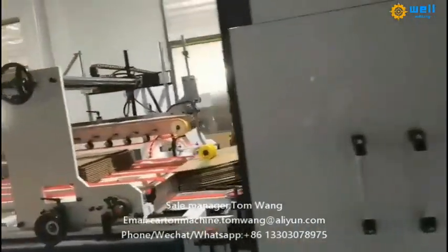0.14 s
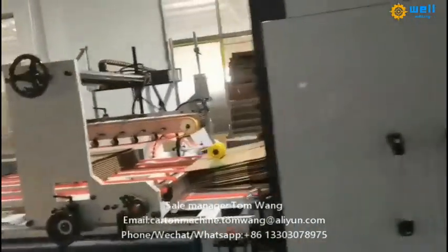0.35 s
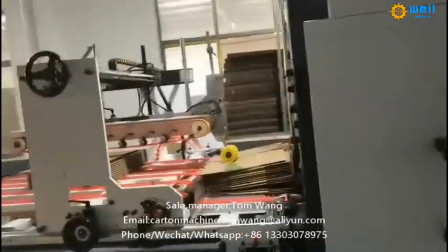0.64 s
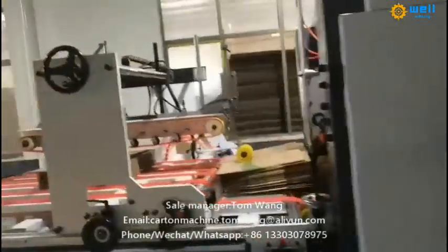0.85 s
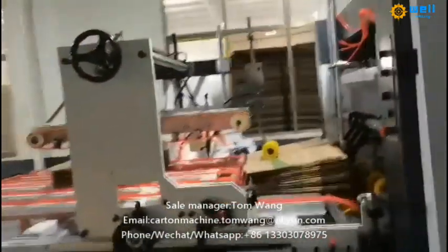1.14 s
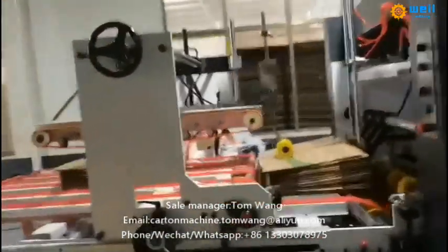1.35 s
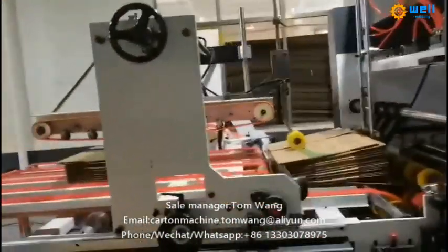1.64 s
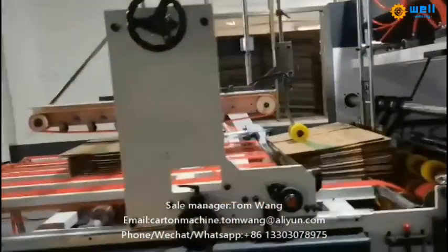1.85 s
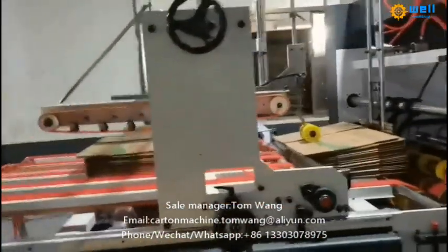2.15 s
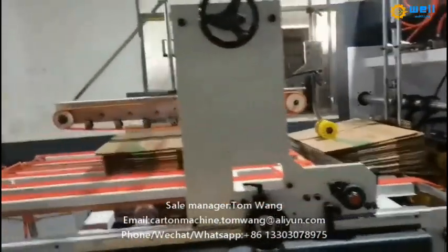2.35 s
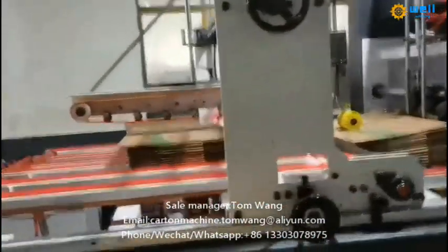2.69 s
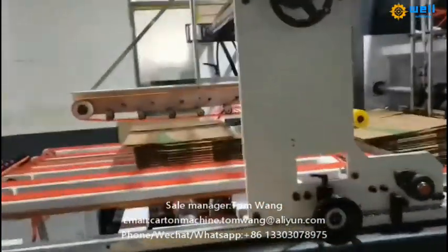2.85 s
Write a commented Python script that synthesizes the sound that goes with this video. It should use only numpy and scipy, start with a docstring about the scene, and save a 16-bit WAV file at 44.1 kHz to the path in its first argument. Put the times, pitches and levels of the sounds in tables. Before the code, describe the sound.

A cardboard folding machine pulls in sheet after sheet, each with a scraping hiss, sharp slaps, dull knocks and a roller rasp. Belts and motors hum underneath while a whine swells and fades in a reverberant factory hall.

```python
"""A carton folder-gluer draws in one cardboard blank about every 0.73 s in a hard-walled factory. Each snatch
brings a scrape and a held, airy hiss; then the blank rasps by friction as the rollers rumble and the frame
booms. Impacts add the rest of the stroke: the board slaps the resonant steel guides, bumps over the rollers and
flexes with a boxy note, and the hall reverberates. Underneath, belts and bearings run on, the motors hum and a
drive whine swells and fades."""
import sys
import numpy as np
from scipy import signal
from scipy.fft import rfft, irfft, next_fast_len
from scipy.io import wavfile
from scipy.ndimage import map_coordinates

SR = 44100
rng = np.random.default_rng(int(sys.argv[2]) if len(sys.argv) > 2 else 0)


def wav_out(sig):
    """Save sig, one row per channel (or a flat mono array), as 16-bit PCM at SR to the path in sys.argv[1]."""
    wavfile.write(sys.argv[1], SR, np.round(np.clip(np.atleast_2d(sig).T, -1, 1) * 32767).astype(np.int16))


N = 133182

# One row per blank. Snatch: t/s, level/dB, attack/s; rollers: t/s, rasp level/dB, hold/s, rumble level/dB
BLANKS = [(-.015, -27.5, 0.027, .2, -21.5, 0.19, -25.5), (.698, -28.5, 0.0029, .94, -22.5, .18, -27.5),
          (1.436, -26, 0.023, 1.66, -23, 0.2, -25), (2.148, -25, 0.02, 2.395, -23.5, 0.18, -25),
          (2.879, -27.5, 0.011, 2.96, -30.5, .18, -29)]
# Spectrum of the rollers: f/Hz, relative level/dB
ROLLER_SPECTRUM = [(20, -33), (55, -12), (95, -7.5), (130, -4), (180, -11.5), (240, 0), (330, -2),
                   (410, -3.5), (490, -6), (580, -13.5), (715, -6.5), (810, -21), (1050, -10), (1300, -70),
                   (2000, -69)]


def amp(db):
    """Amplitude ratio of a level in dB."""
    return 10 ** (np.asarray(db) / 20)


def unit(x):
    """Normalisation to rms 1."""
    return x / np.sqrt(np.mean(x ** 2) + 1e-20)


def clock():
    """Time of each sample, t/s."""
    return np.arange(N) / SR


def along(points, hz):
    """Interpolation of (f/Hz, value) points on a logarithmic frequency axis."""
    f, value = np.transpose(points)
    return np.interp(np.log(hz + 1), np.log(f + 1), value)


def wobble(rate):
    """Random modulation: a spline through rate Gaussian values a second."""
    return map_coordinates(rng.standard_normal(int(N * rate / SR) + 4), [clock() * rate])


def swell(peak_s, rise, fall, hold_s=0, sag=0):
    """Exponential envelope, slopes in dB/s: rises to peak_s, then sags; fall adds in after hold_s."""
    t = clock() - peak_s
    return amp(rise * np.minimum(t, 0) - sag * np.maximum(t, 0) - fall * np.maximum(t - hold_s, 0))


def filtered(x, response):
    """Linear filtering: the spectrum of x times a complex frequency response."""
    size = next_fast_len(N + SR // 2)
    return irfft(rfft(x, size) * response(np.fft.rfftfreq(size, 1 / SR)), size)[:N]


def coloured(x, spectrum):
    """Spectral shaping to rms 1; the colour flickers at random, most in the treble."""
    patch_hz, patch_s = 673, .03
    shaped = filtered(x, lambda f: amp(along(spectrum, f)))
    hz, t, frames = signal.stft(shaped, SR, nperseg=512)
    grid = np.meshgrid(hz / patch_hz, t / patch_s, indexing="ij")
    patches = map_coordinates(rng.standard_normal((128, 512)), grid, mode="wrap")
    flicker_db = 3 * patches * np.sqrt(hz / 5000)[:, None]
    return unit(signal.istft(frames * amp(flicker_db), SR, nperseg=512)[1][:N])


def friction(rate, scatter_db, smooth_db):
    """Friction noise: a Poisson train of tiny uneven impacts, rate a second, over smooth rubbing."""
    hits = (rng.random(N) < rate / SR) * np.sign(rng.standard_normal(N))
    hits *= amp(scatter_db * np.clip(rng.standard_normal(N), -2, 2))
    return unit(unit(hits) + amp(smooth_db) * rng.standard_normal(N))


def guides(x, ring_db):
    """Resonance: x plus the damped modes that it excites in the steel guides."""
    # Modes: f/Hz, bandwidth/Hz, relative level/dB
    modes = [(2073, 72, -5), (2890, 93, -10.5), (3620, 65, -5), (4010, 230, -8), (5270, 85, -5.5),
             (5600, 64, -5), (6160, 58, 0), (6890, 81, -5), (7330, 73, 1.5)]

    def resonance(f):
        return sum(amp(db) * 1j * f * width / (f0 * f0 - f * f + 1j * f * width)
                   for f0, width, db in modes)
    return filtered(x, lambda f: 1 + amp(ring_db) * resonance(f))


def snatches():
    """Sliding friction: a snatched blank scrapes while an airy hiss holds on, then the blank thuds into the
    first rollers."""
    # Spectra of the scrape and the thin hiss: f/Hz, relative level/dB
    scrape_spectrum = [(150, -44), (700, -17), (1400, -2), (2200, -4.5), (3000, -7), (4100, -0.5),
                       (4900, -9.5), (6100, -9.5), (7300, -16.5), (8100, -20), (9300, -14.5), (13500, -24)]
    hiss_spectrum = [(2500, -30), (4200, 0), (5500, 7), (6500, -8), (8000, -3), (9300, 2.5), (11000, -1),
                     (13500, -3)]
    scrape_fall_db_per_s = 63
    scrape, hiss, thud = np.zeros((3, N))
    for start, db, attack_s, *_ in BLANKS:
        t = np.maximum(clock() - start, 0)
        scrape += amp(db - scrape_fall_db_per_s * t) * np.minimum(t / attack_s, 1)
        hiss += amp(-40) * swell(start + .012, rise=1500, fall=110, hold_s=.5, sag=21)
        thud += amp(-28) * swell(start + .069, rise=169, fall=114)
    scrape *= coloured(guides(friction(4000, scatter_db=4, smooth_db=0), ring_db=6.5), scrape_spectrum)
    hiss *= coloured(friction(600, scatter_db=7.5, smooth_db=-3), hiss_spectrum) * amp(.96 * wobble(40))
    thud *= coloured(rng.standard_normal(N), ROLLER_SPECTRUM)
    return scrape + hiss + thud


def motor_hum():
    """Periodic vibration: the motors radiate tones that waver slightly in level and phase."""
    # Tones: f/Hz, rms level/dB
    tones = [(119, -41.5), (227, -45), (703, -47.5), (2030, -55.5)]
    phase = 2 * np.pi * clock()
    return np.sqrt(2) * sum(amp(db + .85 * wobble(6.1)) * np.sin(hz * phase + .59 * wobble(13))
                            for hz, db in tones)


def drive_whine():
    """Amplitude modulation: the drive's single tone swells and fades, with a slight phase jitter."""
    # Envelope: t/s, rms level/dB
    levels = [(0, -29), (.1, -27.5), (.2, -26), (.31, -29), (.355, -44), (.43, -32), (.52, -53), (.64, -65),
              (.76, -30), (.81, -37.5), (.88, -22.5), (.95, -45), (1.19, -34), (1.4, -47), (1.54, -35),
              (1.6, -55), (1.74, -50), (1.82, -26), (1.89, -47), (2.0, -35), (2.09, -49), (2.2, -37),
              (2.42, -41), (2.54, -27.5), (2.59, -37), (2.71, -26.5), (2.79, -33), (2.9, -30.5), (3.0, -27)]
    whine_hz, t = 499.8, clock()
    envelope = amp(np.interp(t, *np.transpose(levels)) + 1.6 * wobble(22.24))
    return np.sqrt(2) * envelope * np.sin(2 * np.pi * whine_hz * t + .45 * wobble(24.02))


def belts():
    """Rolling friction: belts and bearings give a continuous low noise whose level dips now and then."""
    # Running noise: f/Hz, relative level/dB
    spectrum = [(20, -30), (35, -24), (55, -2.5), (98, -5.5), (129, 2.5), (190, -5), (235, 0.5),
                (310, -2.5), (382, -6.5), (440, -8), (498, -3), (584, -13.5), (715, -8), (800, -12),
                (1050, -16), (1500, -22), (2000, -17), (2400, -27.5), (4000, -18.5), (5000, -33),
                (7000, -42), (14000, -45.5)]
    # Envelope: t/s, level/dB
    levels = [(0, -28), (.45, -28.5), (.55, -28), (.61, -35), (.69, -29.5), (.8, -28), (1.1, -26.5),
              (1.29, -26.5), (1.39, -32.5), (1.47, -28.5), (1.8, -27.5), (2.05, -29.5), (2.13, -30.5),
              (2.35, -25.5), (2.7, -28), (3.0, -32)]
    envelope = amp(np.interp(clock(), *np.transpose(levels)) + 1.84 * wobble(18))
    return envelope * coloured(friction(900, scatter_db=4, smooth_db=9.5), spectrum)


def slaps():
    """Impact excitation: board clacks on the steel guides; sharper blows carry more treble."""
    # Blows: t/s, level/dB, treble level re body/dB
    blows = [(.032, -18, -10), (0.132, -21.5, -24), (0.202, -17, -6.5), (.213, -23.5, -10),
             (0.219, -17, -12), (.293, -25, -22), (0.315, -21.5, -24), (.702, -20, -7.5), (.729, -23, -25),
             (.766, -29, -22), (.937, -21, -6), (.962, -21.5, -6), (1.052, -22, -20), (1.456, -27, -9),
             (1.492, -24, -16), (1.618, -30, -24), (1.66, -24, -3), (1.686, -24, -9), (1.738, -24, -22),
             (2.168, -25.5, -14), (2.407, -28, -13), (2.45, -27, -14), (2.525, -26, -17), (2.889, -32.5, 4)]
    # Spectra of a blow's body and treble: f/Hz, relative level/dB
    body_spectrum = [(300, -31), (1000, 3.5), (2000, 1.5), (3600, 5), (4300, 4), (5000, -3.5), (6200, -2),
                     (7400, -15.5), (13500, -30)]
    treble_spectrum = [(2500, -24), (4500, 7), (6200, 5), (7400, -13), (8300, 2.5), (9500, 3.5),
                       (12000, 2.5), (13500, 1)]
    attack_s, t60_s = .0025, .088
    body, treble = np.zeros((2, N))
    for start, db, treble_db in blows:
        t = np.maximum(clock() - start, 0)
        envelope = amp(db - 60 * t / t60_s) * np.minimum(t / attack_s, 1)
        body += envelope
        treble += envelope * amp(treble_db)
    body *= coloured(guides(rng.standard_normal(N), ring_db=4.5), body_spectrum)
    treble *= coloured(rng.standard_normal(N), treble_spectrum)
    return body + treble


def bumps():
    """Damped vibration: the blank bumps over the rollers, each dull knock with two low partials."""
    # Knocks: t/s, level/dB, lower partial f/Hz
    knocks = [(0.043, -17.5, 176), (.149, -15, 233), (.234, -13, 149), (.24, -22, 228), (.305, -22, 67.8),
              (.371, -15, 237.8), (.425, -22, 226), (.512, -22.5, 132.4), (.553, -26, 275),
              (0.773, -19, 262.4), (.9, -16.5, 235.4), (.945, -19, 358), (.978, -16.5, 352.8),
              (1.04, -16, 324), (1.12, -25.5, 343), (1.018, -23, 125), (1.597, -19.5, 172.6),
              (1.64, -18, 224), (1.689, -11, 216), (1.73, -13, 224.7), (1.794, -22, 246),
              (1.907, -23.5, 318), (2.021, -18, 305), (2.228, -17.5, 222), (2.336, -20, 154.7),
              (2.451, -15.5, 261), (2.488, -12.5, 263), (2.484, -22, 130), (2.68, -19.5, 134),
              (2.889, -19.5, 136), (2.985, -15.5, 221)]
    attack_s, t60_s, upper_ratio = .0046, .17, 1.43
    out = np.zeros(N)
    for start, db, hz in knocks:
        t = np.maximum(clock() - start, 0)
        lower = np.sin(2 * np.pi * hz * t + .71 * wobble(70))
        upper = amp(-7) * np.sin(2 * np.pi * upper_ratio * hz * t + wobble(70))
        out += amp(db - 60 * t / t60_s) * (1 - np.exp(-t / attack_s)) * (lower + upper)
    return out


def rollers():
    """Forced vibration: the board's flutes rasp through, the rollers judder and the frame booms."""
    # Spectra of the flutes and the frame: f/Hz, relative level/dB
    flute_spectrum = [(200, -26), (800, -1.5), (1050, -0.5), (1300, -1.5), (1700, -3), (2100, 2.5),
                      (3000, 1), (4300, 0.5), (4800, -7.5), (6100, -9), (7300, -13.5), (8100, -22),
                      (9200, -17.5), (11000, -26.5), (13500, -26)]
    frame_spectrum = [(20, -28), (38, -9), (56, 3), (76, 6.5), (105, -10), (180, -31)]
    rasp, rumble, boom = np.zeros((3, N))
    for *_, arrival, rasp_db, hold_s, rumble_db in BLANKS:
        rasp += amp(rasp_db) * swell(arrival, rise=74, fall=74, hold_s=hold_s, sag=16.5)
        rumble += amp(rumble_db) * swell(arrival + .016, rise=105, fall=68, hold_s=.1)
        boom += amp(-36.5) * swell(arrival + .074, rise=69, fall=160, hold_s=.071)
    crackle = guides(friction(900, scatter_db=3, smooth_db=4.5), ring_db=-4.5)
    rasp *= coloured(crackle, flute_spectrum) * amp(.57 * wobble(70))
    rumble *= coloured(friction(300, scatter_db=3, smooth_db=2.5), ROLLER_SPECTRUM)
    boom *= coloured(rng.standard_normal(N), frame_spectrum)
    return rasp + rumble + boom


def flexes():
    """Flexural vibration: the bending board gives a short, boxy burst of narrow-band noise."""
    # Bends: t/s, level/dB, centre f/Hz
    bends = [(.2, -32, 720), (.32, -26, 705), (.775, -32, 640), (.895, -28.5, 714), (1.0, -30.5, 810),
             (1.53, -31, 700), (1.6, -28.5, 694), (1.69, -27.5, 630), (1.775, -26.5, 690),
             (2.4, -27.5, 1010), (2.41, -24, 724), (2.485, -30, 730)]
    width_oct = .2
    out = np.zeros(N)
    for peak_s, db, hz in bends:
        noise = rng.standard_normal(N)
        band = filtered(noise, lambda f: np.exp(-(np.log2((f + 1) / hz) / width_oct) ** 2))
        out += amp(db) * swell(peak_s, rise=598, fall=167) * unit(band)
    return out


def hall(x):
    """Reverberation: convolution with a diffuse, decaying tail in which the bass lasts longest."""
    # Reverberation times: f/Hz, T60/s
    decay_times = [(100, 0.86), (1000, 0.14), (4000, 0.42), (14000, 0.4)]
    hz, t, frames = signal.stft(rng.standard_normal(SR // 2), SR, nperseg=256)
    decay = amp(-60 * t / along(decay_times, hz)[:, None])
    tail = signal.istft(frames * decay, SR, nperseg=256)[1]
    return signal.fftconvolve(x, tail / np.linalg.norm(tail))[:N]


def scene():
    """Superposition: the working strokes and their reverberation over the running machine."""
    strokes = snatches() + rollers() + slaps() + bumps() + flexes()
    return (strokes + amp(-7) * hall(strokes) + motor_hum() + drive_whine() + belts())[None]


def record(dry):
    """Band limiting: an ideal low-pass filter removes the highest treble."""
    cutoff_hz = 13900
    return filtered(dry[0], lambda hz: hz < cutoff_hz)[None]


dry = scene()
out = record(dry)
wav_out(out)
```